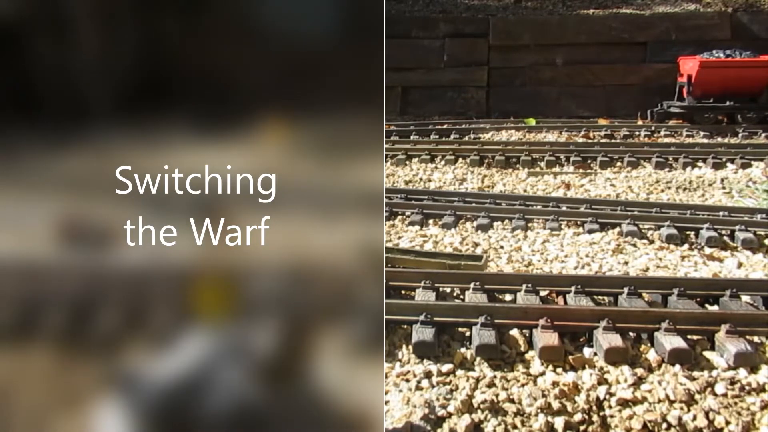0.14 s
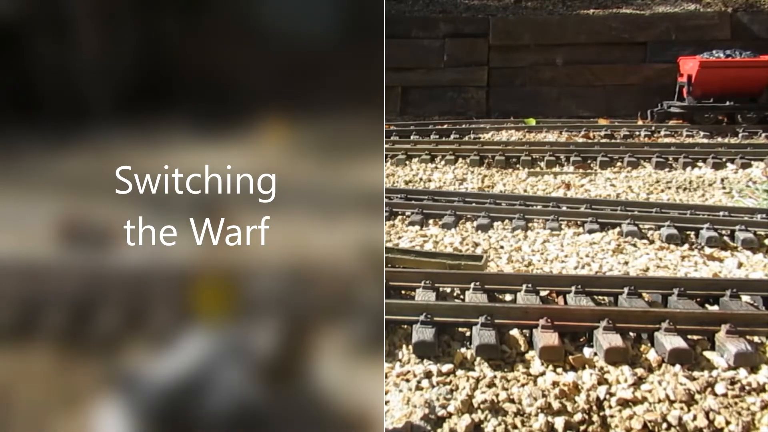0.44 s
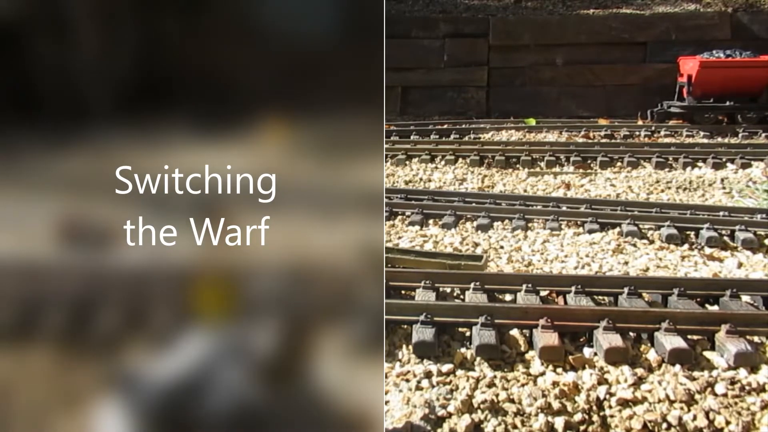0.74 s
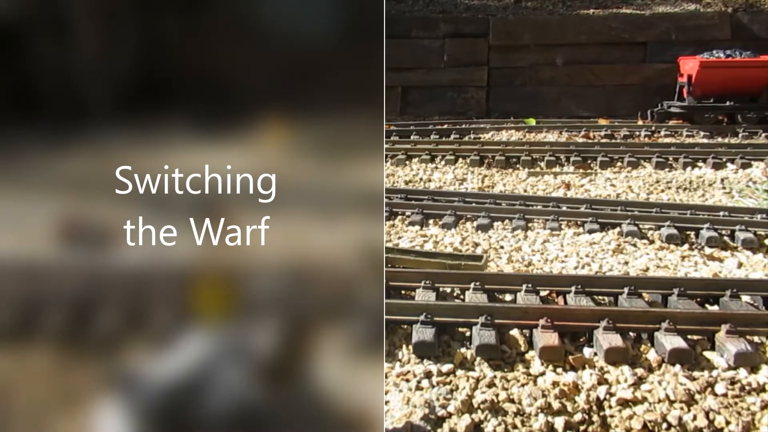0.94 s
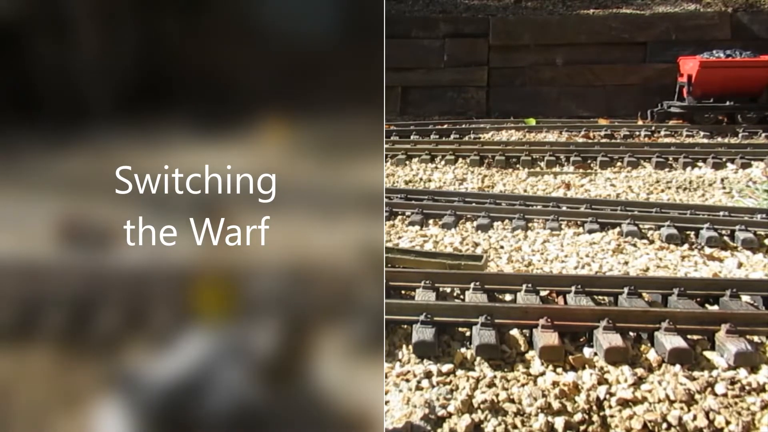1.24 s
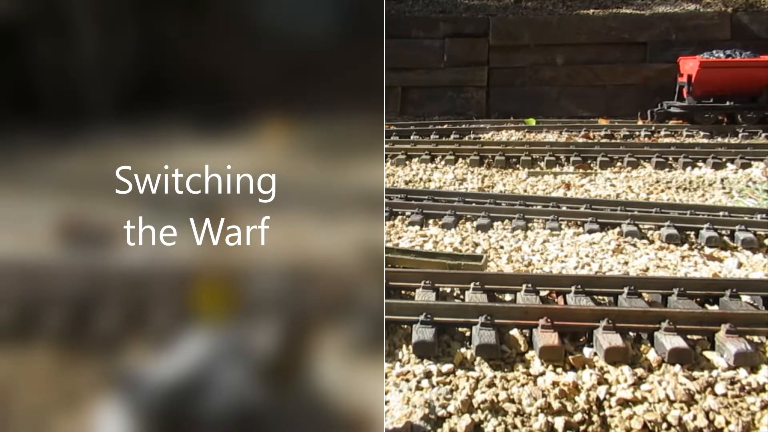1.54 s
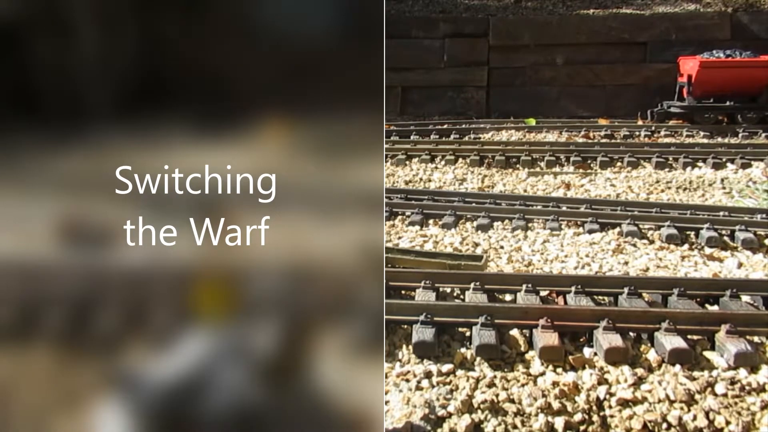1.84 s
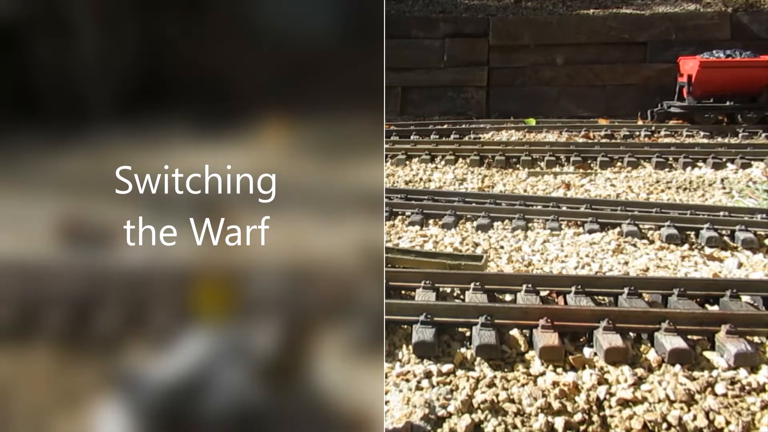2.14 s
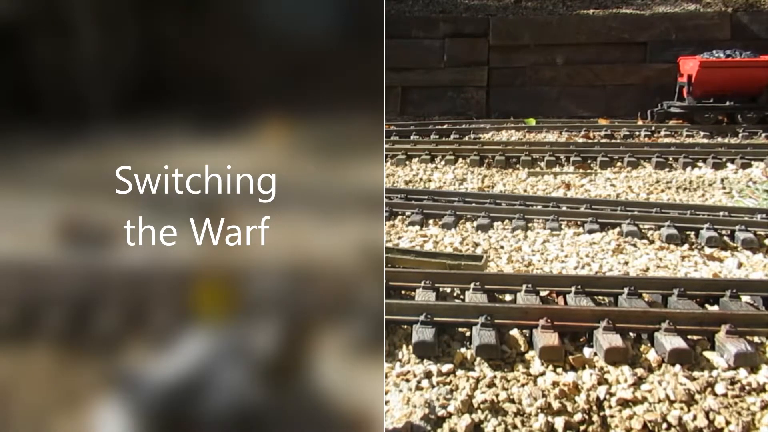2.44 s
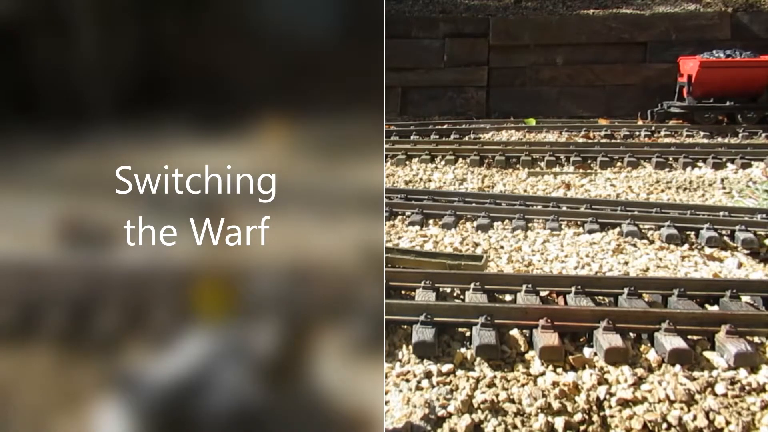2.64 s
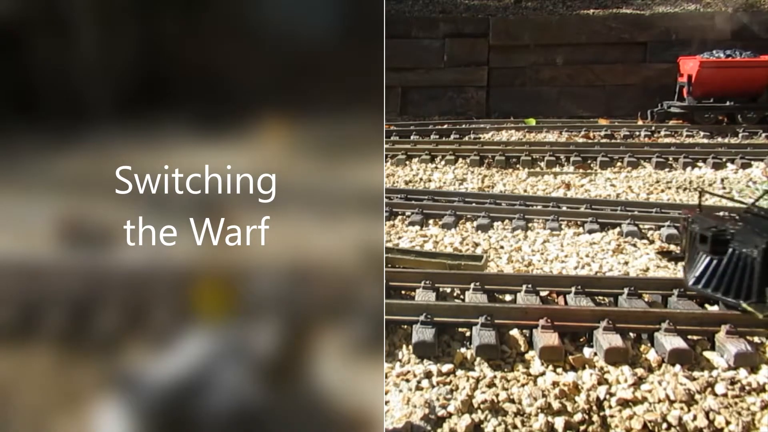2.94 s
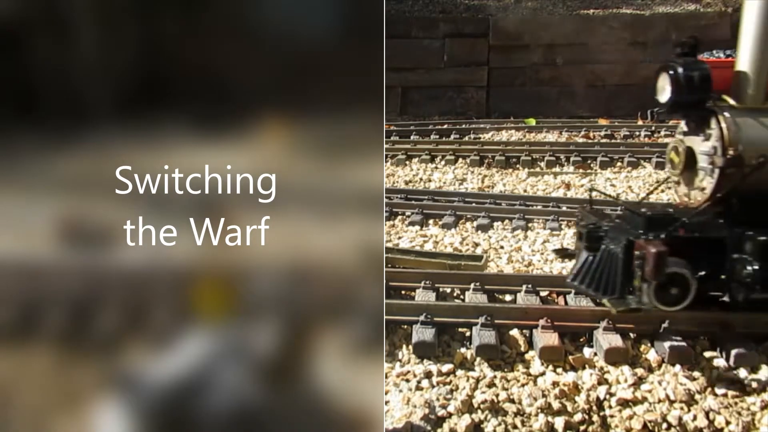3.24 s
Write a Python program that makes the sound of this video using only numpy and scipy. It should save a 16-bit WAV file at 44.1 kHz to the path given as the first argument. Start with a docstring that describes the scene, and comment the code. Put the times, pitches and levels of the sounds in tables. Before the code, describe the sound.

A small steam locomotive hisses, then chuffs rapidly and louder as it rolls near.

```python
"""Small steam locomotive approaching

A small live-steam locomotive rolls towards the microphone on a garden track, over a far rumble.
Steam hisses steadily, a wet blow marks the start, and each exhaust beat bursts up the chimney: noise
driven through resonances that shift as the engine nears. Valve gear clicks ring the same resonances,
and a hollow tone near 1 kHz, narrow noise, sounds on between beats."""
import sys
import numpy as np
from scipy import signal
from scipy.fft import rfft, irfft
from scipy.io import wavfile

SR = 44100
rng = np.random.default_rng(int(sys.argv[2]) if len(sys.argv) > 2 else 0)


def to_linear_factor(level_db):
    """Convert decibel levels (scalar or array-like) to linear amplitude factors."""
    exponent = np.asarray(level_db, float) / 20
    return 10 ** exponent


def persist_wave(psi):
    """Save psi, clipped to +-1, as 16-bit WAV."""
    counts = np.round(np.clip(psi, -1, 1) * 32767).astype(np.int16)
    wavfile.write(sys.argv[1], SR, np.atleast_2d(counts).T)


N = 149940

# How the engine comes near. Each row: time in seconds, nearness as a share (0 far, 1 near).
NEARNESS = [(.6, .05), (1.8, 0.21), (2.6, 0.79), (3.4, 0.8)]


def rms_one(x):
    """Scales a signal to rms 1."""
    return x / np.sqrt(np.mean(x ** 2) + 1e-20)


def in_time(rows):
    """Draws each column of a table as a curve at every sample; the first column is seconds."""
    seconds, *columns = np.transpose(rows)
    return [np.interp(np.arange(N) / SR, seconds, column) for column in columns]


def drift(rate_hz):
    """Smooth random wander of rms 1: white noise through two equal lowpass poles."""
    r = np.exp(-2 * np.pi * rate_hz / SR)
    wander = signal.lfilter([1], [1, -2 * r, r * r], rng.standard_normal(N + SR))
    return rms_one(wander[SR:])  # the first second lets the filter settle


def resonate(x, hz, width_hz):
    """A steep resonance (two poles alike) of gain 1 whose centre may move."""
    turn = np.exp(2j * np.pi * np.cumsum(hz) / SR)
    r = np.exp(-np.pi * width_hz / SR)
    # shift the centre down to 0 Hz, lowpass there, shift back up
    lowpassed = signal.lfilter([(1 - r) ** 2], [1, -2 * r, r * r], x / turn)
    return 2 * np.real(lowpassed * turn)


def rumble():
    """Far traffic and air: steady noise coloured by a spectrum curve."""
    # Colour of the rumble. Each row: frequency in Hz, relative spectrum level in dB.
    colour = [(13, -41), (22, -14), (75, 1), (188, 2.5), (251, -2.5), (396, -2), (437, -5.5), (600, -3.5),
              (780, -7), (1320, -120)]
    level_db = -48
    hz = np.fft.rfftfreq(N, 1 / SR)
    curve_hz, curve_db = np.transpose(colour)
    shape_db = np.interp(np.log(hz + 1), np.log(curve_hz), curve_db, left=-90, right=-90)
    noise = irfft(to_linear_factor(shape_db) * rfft(rng.standard_normal(N)), N)
    return to_linear_factor(level_db) * rms_one(noise)


def hollow():
    """Steam blowing across the smokebox cavity: narrow noise that rises a little as it nears."""
    # Loudness of the hollow tone. Each row: time in seconds, level in dB.
    loudness = [(0.0, -56), (0.45, -53.5), (0.68, -48), (0.81, -45.5), (1.61, -56), (1.86, -55), (2.8, -57),
                (3.02, -54), (3.21, -42), (3.4, -49)]
    far_hz, near_hz, width_hz = 961, 1019, 98
    hz = far_hz + in_time(NEARNESS)[0] * (near_hz - far_hz)
    tone = rms_one(resonate(rng.standard_normal(N), hz, width_hz))
    return to_linear_factor(in_time(loudness)[0]) * tone


def leak():
    """Steady leak of steam: its level and its extra treble in dB, as curves in time."""
    # The hiss of the leak. Each row: time in seconds, level in dB, extra treble in dB.
    hiss = [(0.0, -34.5, 0.5), (0.66, -34.5, 3.5), (0.84, -33.5, -3.5), (2.86, -29.5, 0.5), (3.17, -25, -6),
            (3.4, -29, -5)]
    return in_time(hiss)


def spits():
    """Water drops torn along in the steam: each lifts its power at once, then it sinks back. Mean 1."""
    drops_per_s, relative_size, sink_s = 150, 0.46, 0.0043
    drops = (rng.random(N) < drops_per_s / SR) * np.minimum(rng.exponential(1, N), 3)
    sinking = signal.lfilter([1], [1, -np.exp(-1 / (sink_s * SR))], drops + 1e-18)
    power = 1 + relative_size * sinking
    return power / power.mean()


def blow():
    """A wet blow of steam as the engine starts, as flow power: it swells, holds and falls away."""
    full_flow_s, level_db, hold_s = 0.648, -24.5, 0.1
    rise_db_per_s, fall_db_per_s = 550, 350
    age = np.arange(N) / SR - full_flow_s
    rise_db = rise_db_per_s * np.minimum(age, 0)
    fall_db = fall_db_per_s * np.maximum(age - hold_s, 0)
    return to_linear_factor(2 * np.maximum(level_db + rise_db - fall_db, -150))


def beats():
    """Exhaust beats as flow power in body, treble and low puff: rise, hold, quick drop and tail."""
    # Exhaust beats. Each row: time of full flow in seconds, level in dB, extra treble in dB,
    # low puff against the body in dB, rise in dB/s, hold in seconds,
    # base fall in dB/s (the shares below make it a quick drop and a slower tail).
    beat_rows = [(0.514, -32, 2, 12.5, 700, 0.016, 300), (0.794, -20.5, 0.5, 1, 900, 0.042, 230),
                 (0.918, -15.5, 3, -3.5, 1500, 0.029, 211), (1.081, -18.5, 3, -19, 598, 0.013, 178),
                 (1.21, -20, 2, 0, 714, 0.031, 170), (1.312, -19.5, 2, -1.5, 960, .04, 180),
                 (1.436, -15.5, 0.5, -2, 960, 0.015, 176), (1.583, -17.5, 0.5, -14, 800, 0.023, 166),
                 (1.717, -18.5, 1, 1, 1500, 0.023, 150), (1.844, -18.5, 2, -2, 598, 0.036, 162),
                 (1.987, -14.5, 0, -3.5, 651.5, 0.013, 144), (2.156, -17.5, 0, -1.5, 1098, 0.025, 146),
                 (2.325, -17.5, -1.5, -5, 800, 0.049, 201), (2.473, -17, 1, -1.5, 898, 0.034, 130.5),
                 (2.641, -13, 0, -7, 830, 0.02, 236), (2.824, -14, 0.5, -0.5, 504, 0.013, 233),
                 (2.988, -15, -2.5, -5, 450, 0.024, 180), (3.091, -14, 0.5, -12, 978, 0.026, 113),
                 (3.217, -12.5, 1.5, -3, 900, 0.017, 190), (3.349, -15.5, 0.5, 0, 1368, 0.019, 168)]
    tail_db, drop_share, tail_share = -5, 1.72, 0.61
    treble_fall_share = 1.015  # the treble falls slightly faster than the body
    puff_fall_db_per_s = 318
    t = np.arange(N) / SR
    flows = np.zeros((3, N))
    tail = to_linear_factor(2 * tail_db)
    for full_flow_s, level_db, treble_db, puff_db, rise, hold_s, fall in beat_rows:
        age = t - full_flow_s
        up = to_linear_factor(2 * np.maximum(level_db + rise * np.minimum(age, 0), -150))
        fall_db = np.minimum(fall * np.maximum(age - hold_s, 0), 150)
        quick_drop = (1 - tail) * to_linear_factor(-2 * drop_share * fall_db)
        body = quick_drop + tail * to_linear_factor(-2 * tail_share * fall_db)
        treble = to_linear_factor(2 * treble_db) * body ** treble_fall_share
        puff_fall_db = np.minimum(puff_fall_db_per_s * np.maximum(age - hold_s / 2, 0), 150)
        puff = to_linear_factor(2 * (puff_db - puff_fall_db))
        flows += up * np.array([body, treble, puff])
    return flows


def ticks():
    """Valve gear ticks: single-sample clicks of metal."""
    # Strikes of the valve gear. Each row: time in seconds, relative strength in dB.
    strikes = [(0.5267, -6), (0.659, -9), (0.7567, -21), (0.759, -26), (0.9188, -13), (1.082, 0),
               (1.5843, -3), (1.7248, -4), (1.842, -3.5), (2.1615, -1), (2.82, 1), (3.3515, 4)]
    clicks = np.zeros(N)
    for s, db in strikes:
        clicks[int(s * SR)] = to_linear_factor(db)
    return clicks


def exhaust():
    """Turbulent steam of beats, blow and leak drives every resonance; ticks ring them too."""
    # Chimney and smokebox resonances. Each row: far centre in Hz, near centre in Hz, width in Hz,
    # then the relative drive in dB by a far beat, a near beat, the leak and the starting blow.
    resonances = [(796, 780, 600, -20, -20, -18.5, -17.5), (952, 960, 232, -20, -20, -18, -11),
                  (1565, 1594, 244, -5.5, -3.5, -7, -5), (2066, 2215, 322, -6.5, -7, -3, -7),
                  (2670, 2670, 420, -11, -10, -9, -12), (3300, 3230, 580, -7, -8.5, -8.5, -10),
                  (3756, 3667, 587, -3, -2, -1.5, -3), (3792, 3780, 270, -4, 2.5, -2.5, -5),
                  (4400, 3980, 1500, -18.5, -16, -16.5, -12.5), (5720, 5700, 2930, -22, -17.5, -23, -21),
                  (6770, 6350, 580, -14.5, -10.5, -16.5, -2), (7900, 7800, 2300, -23.5, -38, -20, -12),
                  (9075, 9204, 603, -14, -7, -14.5, -23), (9600, 9650, 430, -17, -22, -30, -15),
                  (11400, 10200, 1800, -33, -34, -29.5, -32), (12300, 12600, 1000, -39, -33, -24.5, -23),
                  (14140, 14300, 2000, -23, -23.5, -27.5, -18.5)]
    puff_to_hz, treble_from_hz = 850, 5000  # far centres below ring to the puff, above to the treble
    sputter_db, leak_sputter_db, sputter_hz = 0.62, 0.7, 149
    surge_db, surge_hz = 0.6, 25
    own_db, own_hz = 1.71, 21.5  # each resonance also wavers on its own
    tick_ring_db, tick_treble_db = 18.5, 1
    near = in_time(NEARNESS)[0]
    flutter = drift(sputter_hz)
    unsteady = spits() * to_linear_factor(2 * (sputter_db * flutter + surge_db * drift(surge_hz)))
    body, treble, puff, wet = np.vstack([beats(), blow()]) * unsteady
    leak_db, leak_treble_db = leak()
    leak_db = leak_db + leak_sputter_db * flutter
    clicks = ticks()
    out = np.zeros(N)
    # offsets the summed width and far-beat drive of all resonances
    unit = np.sqrt(SR / (np.pi * sum(row[2] * to_linear_factor(2 * row[3]) for row in resonances)))
    for far_hz, near_hz, width_hz, far_db, near_db, steady_db, blow_db in resonances:
        high = far_hz > treble_from_hz
        if high:
            beat = treble
        elif far_hz < puff_to_hz:
            beat = puff
        else:
            beat = body
        beat_db = far_db + near * (near_db - far_db)
        leak_power = to_linear_factor(2 * (leak_db + steady_db + high * leak_treble_db))
        flow = np.sqrt(beat * to_linear_factor(2 * beat_db) + wet * to_linear_factor(2 * blow_db) + leak_power)
        steam = unit * flow * to_linear_factor(own_db * drift(own_hz)) * rng.standard_normal(N)
        struck = to_linear_factor(tick_ring_db + beat_db + high * tick_treble_db) * clicks
        out += resonate(steam + struck, far_hz + near * (near_hz - far_hz), width_hz)
    return out


def scene():
    """The engine over the rumble, in mono."""
    return (exhaust() + hollow() + rumble())[None]


def roll_off(x):
    """The treble ends steeply here."""
    return signal.sosfilt(signal.butter(12, 16120, fs=SR, output="sos"), x)


def record(dry):
    """Cuts the top steeply with an elliptic lowpass and returns the finished sound."""
    cutoff_hz = 14990
    lowpass = signal.ellip(10, 0.5, 45, cutoff_hz, fs=SR, output="sos")  # 0.5 dB ripple, 45 dB down
    mix = signal.sosfilt(lowpass, dry)
    return roll_off(mix)


dry = scene()
out = record(dry)
persist_wave(out)
```